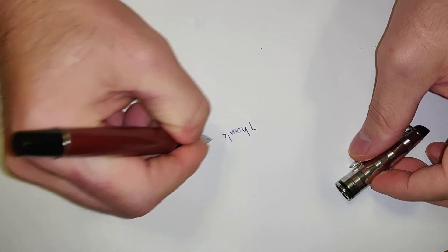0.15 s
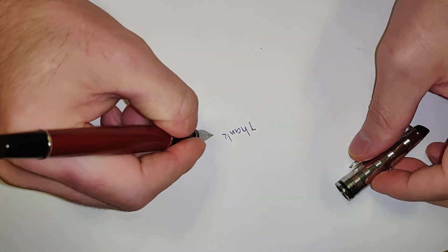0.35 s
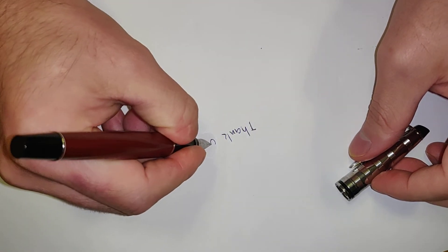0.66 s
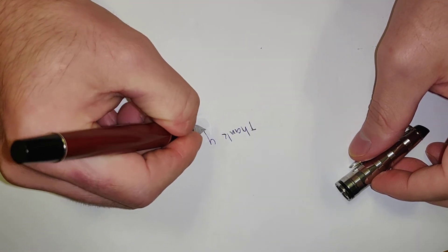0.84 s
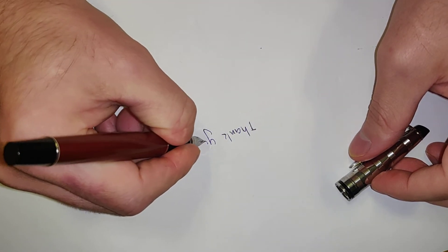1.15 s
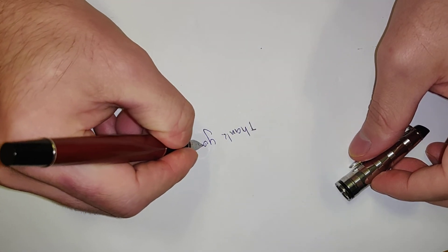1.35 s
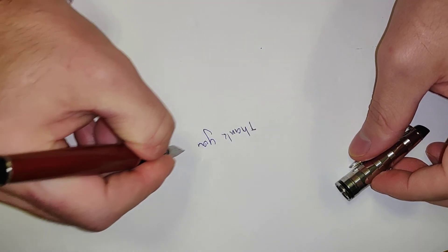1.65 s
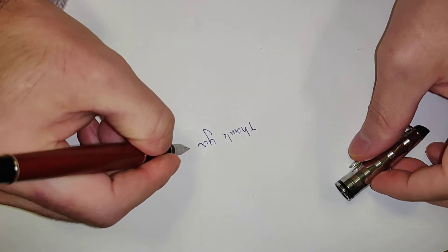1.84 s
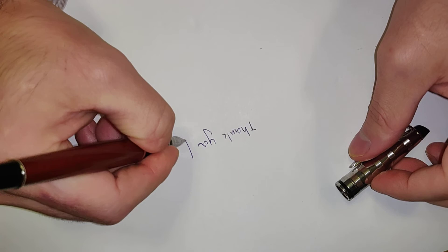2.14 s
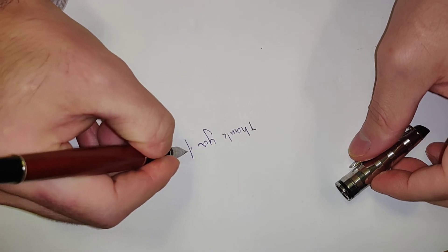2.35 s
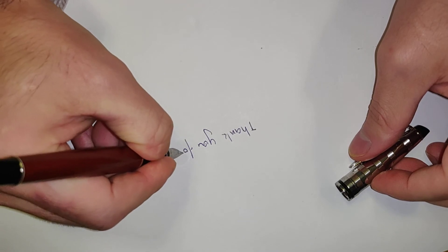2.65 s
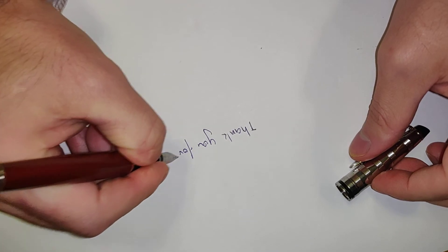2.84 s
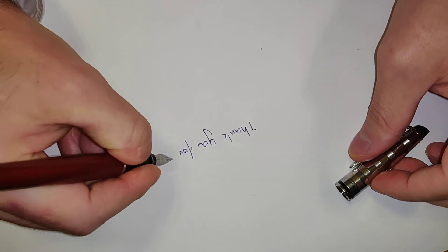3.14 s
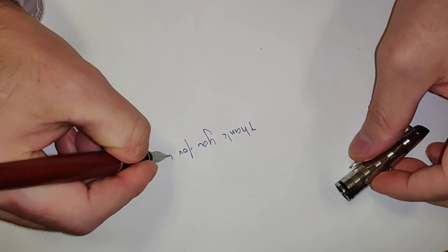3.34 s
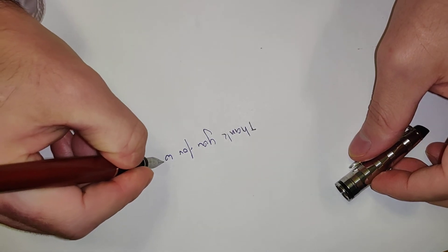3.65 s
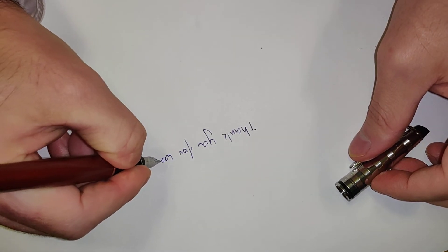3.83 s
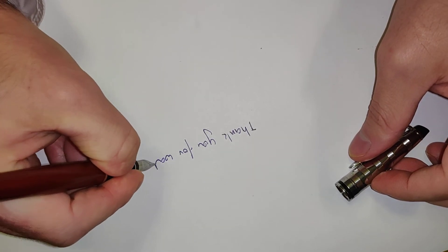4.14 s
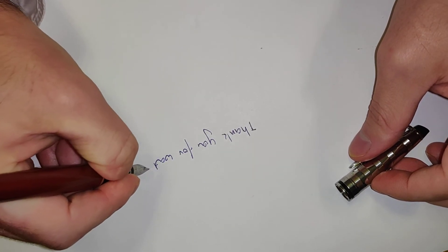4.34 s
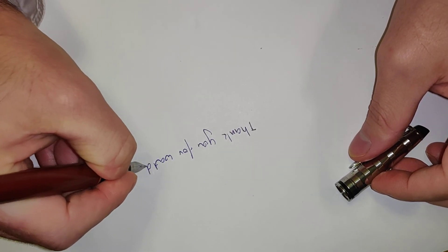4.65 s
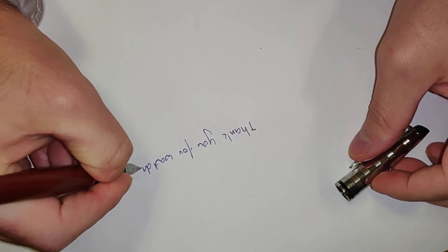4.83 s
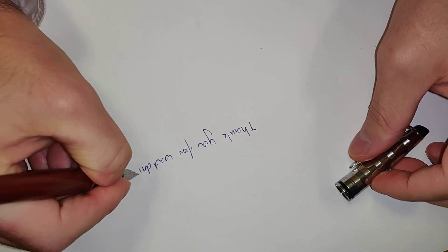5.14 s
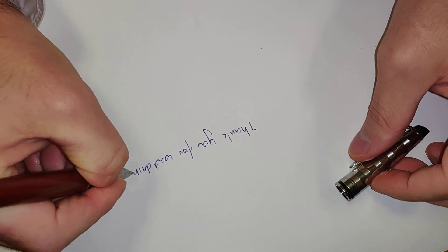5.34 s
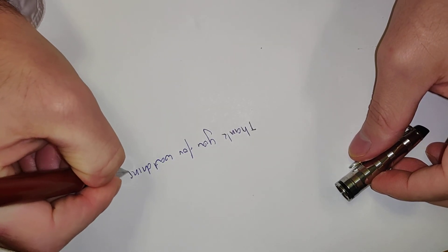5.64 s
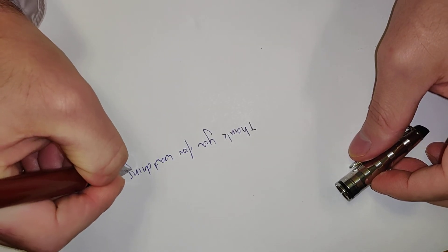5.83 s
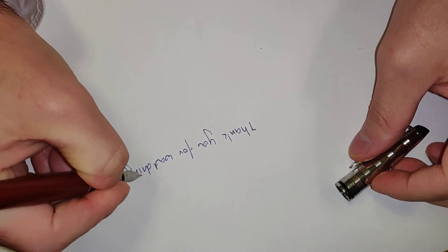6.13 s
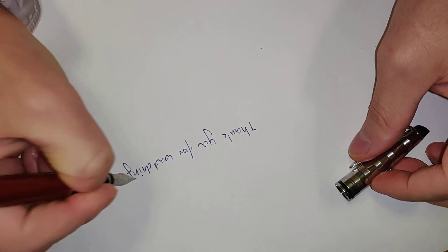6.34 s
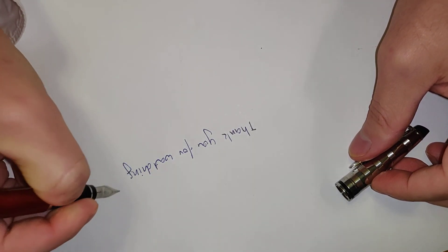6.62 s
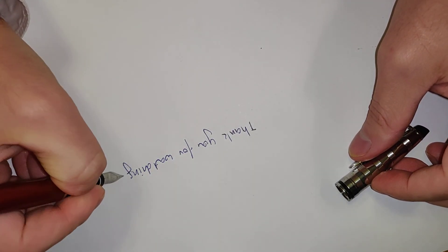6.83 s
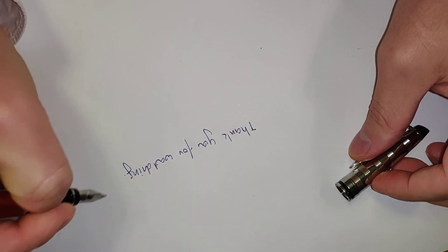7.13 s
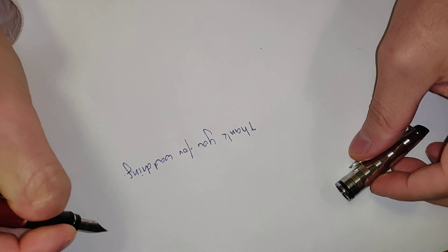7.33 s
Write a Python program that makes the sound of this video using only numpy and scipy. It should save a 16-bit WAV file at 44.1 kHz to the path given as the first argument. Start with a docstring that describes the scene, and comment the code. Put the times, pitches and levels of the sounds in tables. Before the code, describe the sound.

A metal pen nib scratches short, dry strokes across paper in a quiet room with low ventilation hum, small taps and a final sleeve rustle.

```python
"""Fountain pen on paper

A fountain pen writes a short line in a quiet room, heard through a phone's two microphone ports.
Random fibre clicks drive the nib's resonances and the sheet; ticks and desk knocks are struck resonances.
The hand slides along as grainy noise, and a sleeve rustles close by at the end.
A ventilation drone with fuzzy hums and the microphones' hiss, all filtered noise, lie under it.
"""
import sys
import numpy as np
from scipy import signal
from scipy.fft import rfft, irfft
from scipy.io import wavfile

SR = 44100
rng = np.random.default_rng(int(sys.argv[2]) if len(sys.argv) > 2 else 0)


def waveform_to_disk(signal):
    """Save audio, clipped to [-1, 1], as 16-bit WAV at the path in sys.argv[1]."""
    frames = np.transpose(np.atleast_2d(signal))
    scaled = np.clip(frames, -1, 1) * 32767
    samples = np.round(scaled).astype(np.int16)
    wavfile.write(sys.argv[1], SR, samples)


N = 329868
HZ = np.fft.rfftfreq(N, 1 / SR)
TIME = np.arange(N) / SR


# Steady nib modes. Each row: frequency in Hz, width in Hz, left level in dB, right level in dB.
NIB_MODES = [(3860, 1400, -17, -8.5), (6120, 210, 3, -11), (6720, 370, 0, 0), (8220, 740, -19, 0.5)]
# The tine mode, whose strength changes as the pen's angle turns along the line:
# frequency in Hz, width in Hz, left level in dB, right level in dB.
TINE_MODE = (5300, 410, -4, 3)


def nib_response():
    """The nib's steady modes, and the tine mode on its own, at each port."""
    return np.array([chord(NIB_MODES), chord([TINE_MODE])])


# Nib strokes. Each row: start in seconds, length in seconds, nib ring in dB, paper in dB against the ring.
STROKES = [(0.0, .066, -74.5, -10), (0.551, .068, -66, -9), (.652, .04, -74, -18), (.776, .087, -63.5, -8),
           (0.916, .058, -63, -3.5), (1.033, .048, -74, -6), (1.17, .055, -68.5, -10),
           (1.229, .08, -70.5, -5), (1.311, 0.036, -71.5, -9), (1.408, 0.04, -75, -10),
           (1.474, .111, -70, -7), (1.626, .034, -73, -1), (1.796, .076, -67, -8), (2.012, .04, -73, -8),
           (2.106, 0.052, -58, -6), (2.308, .058, -75, -5), (2.441, .065, -66.5, -9),
           (2.534, .051, -72, -5), (2.628, 0.044, -75, -7), (2.745, .039, -68.5, -9.5),
           (2.84, .059, -73.5, -1), (3.062, .058, -62.5, -14), (3.178, .05, -77, -6),
           (3.265, .073, -70, -6), (3.425, 0.11, -71.5, -3), (3.601, .067, -72.5, -15),
           (3.675, 0.037, -72.5, -2), (3.726, .061, -75.5, -1.5), (3.807, .064, -75.5, -5),
           (3.921, 0.063, -72, -2), (3.97, 0.089, -72.5, 0.5), (4.103, .043, -70, -7),
           (4.27, 0.11, -71, -9), (4.377, .064, -74, -3), (4.446, .1, -75.5, -4), (4.566, .046, -70, -4),
           (4.656, .073, -70.5, -4), (4.757, .071, -76, -3), (4.839, .053, -73.5, -10),
           (5.027, .039, -69.5, -7), (5.216, .056, -71, -7), (5.412, .09, -71, -10),
           (5.693, 0.09, -64.5, -8), (5.819, .053, -66, -2), (5.917, 0.051, -68.5, -5.5),
           (6.054, .073, -71, -15), (6.768, .043, -74, -9), (7.053, .05, -78, -7)]
# Colour of the sheet on the desk. Each row: frequency in Hz, relative level in dB.
PAPER_COLOUR = [(500, 2), (950, 2), (1500, 1), (2000, 9), (2800, 0), (3700, -6.5), (4800, -14)]
# Colour of the finest fibres. Each row: frequency in Hz, relative level in dB.
SHEEN_COLOUR = [(7500, -1), (9500, -6.5), (11500, -8), (13200, -4), (14500, -1), (15600, -16)]
# The pen's angle to the phone turns along the line. Each row: time in seconds, tines in dB, sheen in dB
# and right port in dB, all against the ring, then rasp in dB against the paper.
PEN_ANGLE = [(0, 0.5, -11, -6, -7), (1.6, 0.5, -14, -6.5, -5), (2.1, -6, -14, -8, -8),
             (4, -4, -7.5, -3, -4.5), (6, -9, -6.5, -7, 3)]
RISE_SHARE = 0.43  # part of a stroke spent speeding up
RASP_HZ, RASP_WIDTH_HZ = 1587, 430


def strokes():
    """Each stroke swells and fades with the nib's speed and drives ring, tines, paper, rasp and sheen."""
    ring_power, paper_power = np.zeros((2, N))
    for start, length, db, paper_db in STROKES:
        rise, fall = RISE_SHARE * length, (1 - RISE_SHARE) * length
        first = max(round((start - 2 * length) * SR), 0)
        near = slice(first, round((start + 3 * length) * SR))
        t = TIME[near] - start - rise  # zero at top speed
        drop_db = 8.3 * abs(t / np.where(t < 0, rise, fall)) ** 2.9
        power = amp(2 * (db - drop_db))
        ring_power[near] += power
        paper_power[near] += power * amp(2 * paper_db)
    speed, paper = np.sqrt(ring_power), np.sqrt(paper_power)

    s, *angle = np.transpose(PEN_ANGLE)
    tines, sheen, right, rasp = (amp(np.interp(TIME, s, db)) for db in angle)
    fibres = grains(per_s=9000, spread_db=4.0, likeness=0.3, lag=9.5)

    body, tine = irfft(rfft(fibres) * nib_response(), N)
    ring = (body + tines * tine) / body.std(axis=1, keepdims=True)
    nib = speed * np.array([np.ones(N), right]) * ring

    rasping = evened(irfft(rfft(fibres) * ringing(RASP_HZ, RASP_WIDTH_HZ) ** 2, N))
    sheet = paper * (evened(coloured(fibres, PAPER_COLOUR)) + rasp * rasping)
    finest = speed * sheen * evened(coloured(fibres, SHEEN_COLOUR))
    return nib + sheet + finest


# The nib lands or lifts. Each row: time in seconds, relative level in dB,
# then tines and sparkle in dB against that level.
TICKS = [(0.522, -63, 4, 0), (1.1248, -59, -5, 0), (2.0048, -48, 2, 0), (2.268, -57.5, -8, -2),
         (2.403, -60, -2, -3), (4.2408, -56, -4, -2), (4.9862, -55, -8, -6), (5.1686, -59, -3, 0),
         (6.2744, -60, -2, 0), (6.333, -52, -3, 2), (6.9996, -52.5, 2, -5), (7.005, -59, 0, 3),
         (7.071, -60, 0, -1)]
# A tick's modes: barrel, tines, two of the tip, sparkle.
# Each row: frequency in Hz, width in Hz, left level in dB, right level in dB.
SNAP_MODES = [(2900, 1800, -1, -6), (5000, 580, 3, 3), (6240, 900, 5, -2), (7400, 1100, -3, 4.5),
              (14700, 3500, -6, -7)]
TRAVEL_S = .0009  # from the nib to the phone
TICK_PAN_DB, BARREL_DB = 2.1, -1.5  # pan: left over right


def ticks():
    """A sharp snap, its bounce off the hand and a faint rattle; tines and sparkle vary with landing angle."""
    blows, t = np.zeros((3, 2, N)), np.arange(400) / SR
    rattle_decay = amp(-18.0 - 60 * t / 0.022)
    shapes = rng.standard_normal((len(TICKS), 2, 400)) * rattle_decay
    shapes[:, :, 0] = -1  # the snap
    shapes[:, [0, 1], [84, 66]] = .35  # the bounce, at its own sample in each port
    for (s, db, tines_db, sparkle_db), shape in zip(TICKS, shapes):
        at = round((s + TRAVEL_S) * SR)
        gains = amp([db, db + tines_db, db + sparkle_db])
        blows[:, :, at:at + 400] += gains[:, None, None] * shape
    pan = amp([[TICK_PAN_DB / 2], [-TICK_PAN_DB / 2]])
    tip, tines, sparkle = rfft(blows * pan)
    pen = amp(BARREL_DB) * chord(SNAP_MODES[:1]) + chord(SNAP_MODES[2:4])
    struck = tip * pen - tines * chord(SNAP_MODES[1:2]) + sparkle * chord(SNAP_MODES[4:])
    return amp(17.5) * irfft(struck, N)


# Knuckle or barrel on the desk. Each row: time in seconds, relative level in dB,
# then low modes and high modes in dB against that level.
KNOCKS = [(.107, -64, -2, 0), (2.4268, -50.5, 5, 1.5), (2.8432, -50, -4, -10), (2.8565, -60, 3, -2),
          (2.861, -53, -3, 1), (4.03, -63, -5, 9), (4.189, -66, 0, -4), (6.3332, -63, -4, 6),
          (6.9998, -64, 0, 3), (7.0042, -55.5, 0, 1)]
# Modes of the desk: two low, two middle, three high. Each row: frequency in Hz, width in Hz, level in dB.
DESK_MODES = [(392, 160, 0), (615, 180, -2), (815, 160, 4.5), (1060, 290, 3), (1490, 300, -3.5),
              (2020, 450, -3), (2400, 500, -8)]
BOUNCE_S, BOUNCE_DB = 0.00322, -6  # every knock lands twice


def knocks():
    """Blows into the desk's modes; softness and hardness weight the lowest and highest of them."""
    blows = np.zeros((3, N))
    for s, db, low_db, high_db in KNOCKS:
        blows[:, round(s * SR)] = -amp([db + low_db, db, db + high_db])
    bounce = amp(BOUNCE_DB) * np.roll(blows, round(BOUNCE_S * SR), axis=1)
    low, middle, high = rfft(blows + bounce)
    struck = low * chord(DESK_MODES[:2]) + middle * chord(DESK_MODES[2:4]) + high * chord(DESK_MODES[4:])
    left = amp(31.5) * irfft(struck, N)[0]
    return np.array([left, np.roll(left, 8)])  # right port 8 samples later


# Hand slides. Each row: start in seconds, up to speed in seconds, stop in seconds,
# then skin and paper levels in dB before their layer gains.
SLIDES = [(.1, 0.214, 0.28, -62.5, -63.5), (.3, 0.346, 0.39, -70.5, -69), (1.665, 1.694, 1.768, -64, -73),
          (2.905, 2.947, 3.025, -62.5, -71), (6.532, 6.595, 6.678, -68, -76)]
# Colour of skin on paper. Each row: frequency in Hz, left level in dB, right level in dB.
SKIN_COLOUR = [(397, 1.5, -8), (900, 3, 5.5), (2420, -4.5, -5.5), (3400, -2.5, -3), (4970, -0.5, -5.5),
               (6240, 5, -4), (7600, -3, 2), (8900, -13.5, -7), (11100, -12, -11.5), (13500, -8, -8),
               (15400, -12, -5)]
SKIN_START_DB, SKIN_RELEASE_S = -19, 0.041  # swells from this far down, fades as far in this time
SHEET_START_DB, SHEET_RELEASE_S = -7, .07  # the shaken paper, likewise


def hand():
    """The side of the hand drags over the sheet: a wide patch of fine grains that also shakes the paper."""
    rub = grains(per_s=20000, spread_db=0.0, likeness=0.13, lag=20)
    rub = rub * clumps(per_s=63, depth_db=1.5)
    skin = sum(slide(*s, db, SKIN_START_DB, SKIN_RELEASE_S) for *s, db, _ in SLIDES)
    sheet = sum(slide(*s, db, SHEET_START_DB, SHEET_RELEASE_S) for *s, _, db in SLIDES)
    skin_sound = amp(5.0) * skin * evened(coloured(rub, SKIN_COLOUR))
    return skin_sound + amp(-5.5) * sheet * evened(coloured(rub, PAPER_COLOUR))


def slide(start, full, stop, db, start_db, release):
    """Swells up to speed, holds, and fades after the stop."""
    return level([(start, db + start_db), (full, db), (stop, db), (stop + release, db + start_db)])


# Sleeve movement. Each row: time in seconds, level in dB before the layer gain.
RUSTLE = [(7.38, -72), (7.396, -76), (7.44, -56), (7.48, -46.5)]
# Colour of the cloth. Each row: frequency in Hz, left level in dB, right level in dB.
CLOTH_COLOUR = [(200, 7, 11), (1000, 0, -1.5), (2500, -5, -7), (4070, -0.5, -5), (5700, 1, -12),
                (6700, 4.5, -18), (7900, -17, 1.5), (9200, -12, -17), (12500, -20, -16), (15000, -17, -18)]
# Hollows between sleeve and desk. Each row: frequency in Hz, width in Hz, level in dB.
FOLDS = [(437, 170, 2), (970, 110, 9), (1960, 270, -1.5), (3000, 180, 4), (3740, 150, -14), (4840, 300, -4),
         (5660, 270, 3.5)]


def sleeve():
    """Cloth brushes near the phone, much the same at both ports, ringing in its folds."""
    brush = grains(per_s=15000, spread_db=-1.5, likeness=0.84, lag=3)
    folds = evened(irfft(rfft(brush) * chord(FOLDS), N))
    cloth = evened(coloured(brush, CLOTH_COLOUR)) + amp(-1.5) * folds
    return amp(2.0) * cloth * level(RUSTLE) * clumps(per_s=150, depth_db=2.0)


def reflections(x):
    """Desk and walls: sparse taps of random sign, different at each port, dying fast."""
    t = np.arange(4000) / SR
    signs = rng.choice([-1, 1], (2, 4000))
    present = (rng.random((2, 4000)) < .05) * (t > .0015)
    taps = signs * present * amp(-60 * t / 0.17)  # 60 dB down in 0.17 s
    taps = taps / np.linalg.norm(taps, axis=1, keepdims=True)
    return signal.oaconvolve(x, taps, axes=1)[:, :N]


# Likeness of the air noise at the two ports. Each row: frequency in Hz, left-right likeness from 0 to 1.
PORT_LIKENESS = [(25, 0.95), (100, 1), (250, 0.84), (400, 0.44), (700, 0.35), (900, 0.19), (1200, .02),
                 (3000, .02)]


def air():
    """Spectra of white noise at both ports, alike in the bass only."""
    a, b = rfft(rng.standard_normal((2, N)))
    same = np.clip(read(PORT_LIKENESS)[0], 0, 1)
    return np.array([a, same * a + np.sqrt(1 - same ** 2) * b])


# Colour of the ventilation. Each row: frequency in Hz, relative level in dB per Hz.
DRONE_COLOUR = [(14, -10.5), (22, -2), (35, -9.5), (50, -10.5), (66, -12), (82, -16), (110, -9),
                (140, -4.5), (175, -14.5), (250, -19), (320, -28), (450, -30), (750, -39), (950, -38.5),
                (1400, -49), (2200, -65)]
DRONE_DB = -47
# Hums in the ventilation. Each row: frequency in Hz, width in Hz, level in dB before wavering.
HUMS = [(98.2, 8.2, -57), (150.84, 13.2, -55), (671, 17, -82), (890, 39, -77)]


def room():
    """Ventilation rumble as coloured noise, with wavering hums of narrow resonances in noise."""
    drone = amp(DRONE_DB) * evened(coloured(irfft(air(), N), DRONE_COLOUR))
    fan = air()
    hums = sum(amp(db) * evened(irfft(fan * ringing(hz, width) ** 2, N)) for hz, width, db in HUMS)
    return drone + hums * clumps(per_s=1.5, depth_db=2.0)


def amp(db):
    """Amplitude factor of a level in dB."""
    return 10 ** (np.asarray(db) / 20)


def evened(x):
    """Scales a sound to an overall RMS of 1."""
    return x / np.sqrt(np.mean(x ** 2) + 1e-20)


def read(points):
    """Columns of a table over log frequency, one row of values per column."""
    f, *columns = np.transpose(points)
    return np.array([np.interp(np.log(HZ + 1), np.log(f), c) for c in columns])


def coloured(x, points):
    """Filters by a dB spectrum that falls away below its first point."""
    low = np.minimum(HZ / points[0][0], 1) ** 4
    return irfft(rfft(x) * amp(read(points)) * low, N)


def ringing(hz, width):
    """Response of one resonance of gain 1."""
    return 1j * width * HZ / (hz ** 2 - HZ ** 2 + 1j * width * HZ)


def chord(modes):
    """Sum of resonances, neighbours in opposite phase; one row per level column."""
    return sum((-1) ** k * amp(db)[:, None] * ringing(hz, width) for k, (hz, width, *db) in enumerate(modes))


def grains(per_s, spread_db, likeness, lag):
    """Fibres snapping: random clicks, partly shared by the ports, the right one later by lag in samples."""
    size = amp(spread_db * np.minimum(rng.exponential(1, (2, N)), 5))
    size = size * rng.choice([-1, 1], (2, N))
    own = evened(size * (rng.random((2, N)) < per_s / SR))
    likeness = np.clip(likeness, 0, 1)
    right = likeness * own[0] + np.sqrt(1 - likeness ** 2) * own[1]
    return np.array([own[0], np.roll(right, round(lag))])


def clumps(per_s, depth_db):
    """Random unevenness of level, no faster than per_s in Hz."""
    slow = irfft(rfft(rng.standard_normal(N)) * (HZ < per_s), N)
    return amp(depth_db * evened(slow))


def level(rows):
    """Gain along a dB curve, silent outside it unless the curve reaches the end of the scene."""
    s, db = np.transpose(rows)
    after = db[-1] if s[-1] > TIME[-1] - .01 else -140
    return amp(np.interp(TIME, s, db, -140, after))


def scene():
    """Pen, hand and sleeve with their reflections, over the room."""
    desk = strokes() + hand() + sleeve()
    hits = ticks() + knocks()
    return desk + hits + reflections(amp(-6.5) * desk + amp(-9.0) * hits) + room()


# Colour of the microphones' hiss. Each row: frequency in Hz, relative level in dB.
HISS_COLOUR = [(500, 5), (1200, 7), (2000, 5.5), (3500, 1), (6500, 0.5), (9000, -1.5), (13000, -1.5),
               (15500, 1.5)]
HISS_DB, EDGE_HZ = -67.5, 15750  # edge: top of the band


def record(dry):
    """Each microphone adds its own hiss; then a steep low-pass limits the band."""
    hiss = amp(HISS_DB) * evened(coloured(rng.standard_normal((2, N)), HISS_COLOUR))
    lowpass = signal.firwin(1023, EDGE_HZ, window=("kaiser", 9), fs=SR)
    return signal.oaconvolve(dry + hiss, lowpass[None], "same")


dry = scene()
out = record(dry)
waveform_to_disk(out)
```